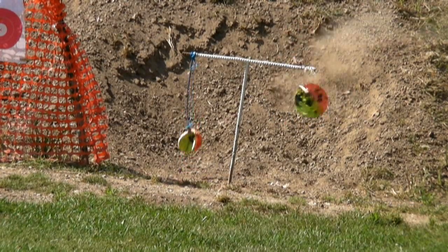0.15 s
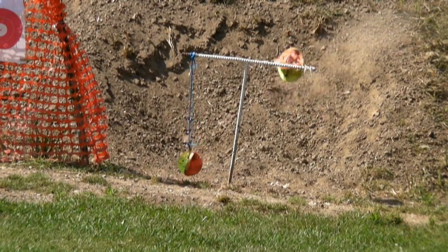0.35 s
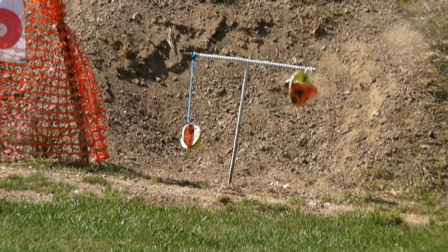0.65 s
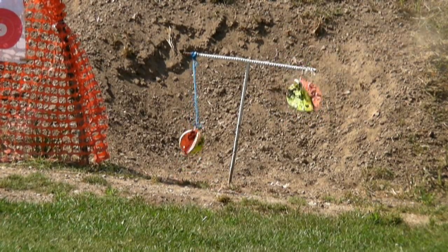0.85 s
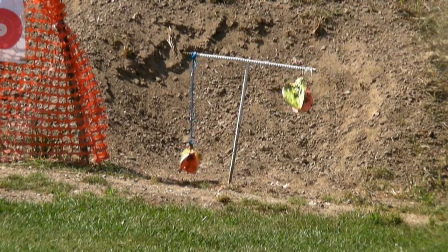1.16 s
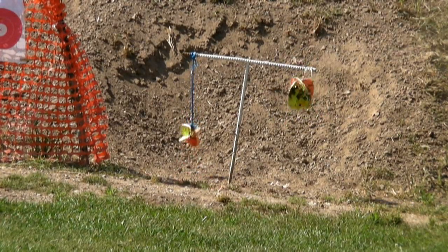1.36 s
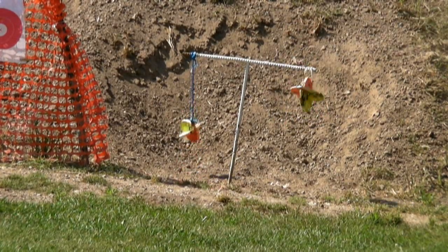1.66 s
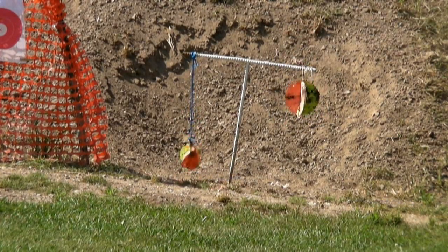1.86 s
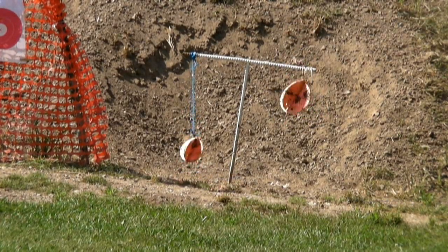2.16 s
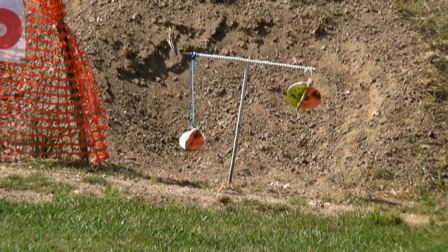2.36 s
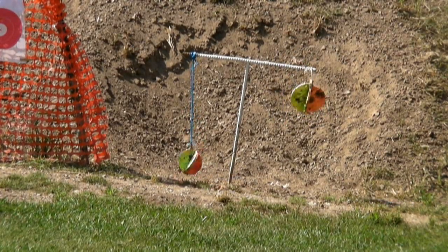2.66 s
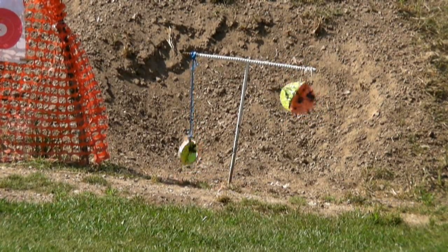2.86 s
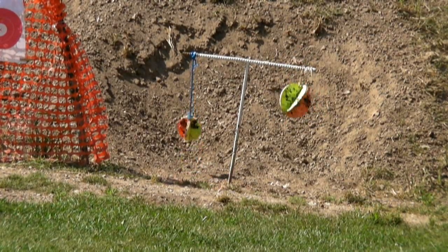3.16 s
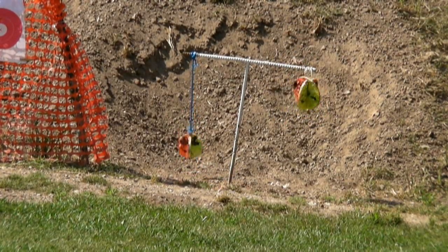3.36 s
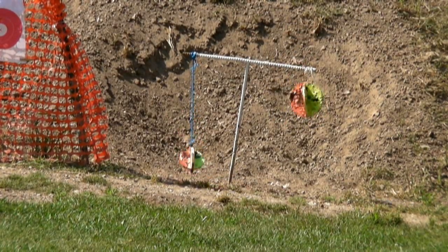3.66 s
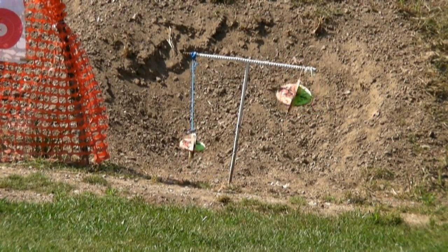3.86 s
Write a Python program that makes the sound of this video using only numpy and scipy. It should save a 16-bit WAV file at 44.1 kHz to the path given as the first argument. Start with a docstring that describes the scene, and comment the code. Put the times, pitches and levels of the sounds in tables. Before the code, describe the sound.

A rifle's lever clacks open and shut between a fading echo and a loud shot.

```python
"""An outdoor rifle range, from the roofed firing point. The echo of a shot rolls away over the earth
banks while the rifle's lever is thrown open and slammed shut, metal clacking and ringing. Sleeves
rustle, and dull knocks ring the wooden bench as the rifle is settled. Insects throb over open air
and a far engine until the next shot overloads the microphone."""
import sys
import numpy as np
from scipy import signal
from scipy.fft import rfft, irfft
from scipy.io import wavfile

SR = 44100
rng = np.random.default_rng(int(sys.argv[2]) if len(sys.argv) > 2 else 0)


def generate_wav(signal):
    """Clip the signal to [-1, 1] and save it as 16-bit WAV at the path in sys.argv[1]."""
    frames = np.transpose(np.atleast_2d(signal))
    scaled = np.clip(frames, -1, 1) * 32767
    pcm = np.round(scaled).astype(np.int16)
    wavfile.write(sys.argv[1], SR, pcm)


N = 176400
TIME = np.arange(N) / SR
FREQ = np.maximum(np.arange(N // 2 + 1) * SR / N, 1)


def from_db(db):
    """Decibels to gain."""
    return 10 ** (np.asarray(db) / 20)


def at_hz(points, hz):
    """Read a table on a log-frequency axis."""
    f, value = np.transpose(points)
    return np.interp(np.log(hz), np.log(f), value)


def decay(start, t60):
    """An envelope that jumps to 1 and falls 60 dB in t60 seconds."""
    age = TIME - start
    return (age >= 0) * np.exp(-np.log(1000) * np.clip(age / t60, 0, 10))


def swell(peak_s, half_width_s):
    """A bell-shaped fade in and out."""
    return np.exp(-((TIME - peak_s) / half_width_s) ** 2)


def resonance(hz, width_hz):
    """A band-pass curve that peaks at 1."""
    return 1 / (1 + 2 * ((FREQ ** 2 - hz ** 2) / (2 * FREQ * width_hz)) ** 2)


# Stereo images shared by several layers, far and near: (frequency [Hz], left-right correlation [0-1])
FAR_IMAGE = [(2000, 0.99), (6000, 0.95), (15000, 0.57)]
NEAR_IMAGE = [(300, 1), (3000, 0.98), (7000, 0.92), (14000, 0.19)]
def noise(colour, image):
    """Stereo noise with a given colour and stereo image, at unit rms."""
    alike = np.clip(at_hz(image, FREQ), -1, 1)
    mid, side = rng.standard_normal((2, 2 * len(FREQ))).view(complex)
    spectrum = np.sqrt(1 + alike) * mid + np.sqrt(1 - alike) * side * [[1], [-1]]
    x = irfft(colour * spectrum, N)
    return x / np.sqrt(np.mean(x ** 2) + 1e-20)


def fade_by_band(x, t60s, count=8):
    """Let each band die away at its own rate."""
    centres, spectrum = np.geomspace(80, 15000, count), rfft(x)
    bands = (irfft(spectrum * np.interp(np.log(FREQ), np.log(centres), share), N)
             for share in np.eye(count))
    return sum(band * decay(0, at_hz(t60s, hz)) for band, hz in zip(bands, centres))


def struck_mode(start, hz, t60, detune=0.011):
    """Three close partials that beat; the higher the pitch, the further left and right are out of step."""
    skew = np.arccos(np.clip(at_hz(NEAR_IMAGE, hz), -1, 1)) * np.array([[0], [1]])
    age = TIME[:SR // 2]
    partials = hz * (1 + detune * np.array([0, -1, 1]) * rng.uniform(0.5, 1, 3))
    ring = sum(gain * np.sin(2 * np.pi * f * age + phase + skew)
               for f, gain, phase in zip(partials, (1, 0.5, 0.5), (0, np.pi / 2, np.pi / 2)))
    ring *= decay(0, t60)[:SR // 2] / np.sqrt(2)
    return np.pad(ring, [(0, 0), (int(start * SR), N)])[:, :N]


# Tone of the rolling echo: (frequency [Hz], level [dB])
ECHO_EQ = [(40, -26), (300, -7.5), (520, -2), (850, -7.5), (1700, -3.5), (2800, -10), (4200, -10.5),
           (7000, -22.5), (15500, -50.5)]
# Length of its tail: (frequency [Hz], t60 [s])
ECHO_DECAY = [(100, 1.83), (500, 2.56), (1500, 2.2), (4000, 1.11), (9000, 0.91)]
# Stronger returns from the banks: (time [s], boost [dB], half width [s])
BANK_RETURNS = [(0.046, 4, 0.0099), (.074, 6, 0.022), (0.173, 5, 0.075), (.4, 5, 0.2)]
# Lone, sharp slapbacks: (time [s], level [dB])
SLAPBACKS = [(.108, -17), (.156, -21)]
# Resonances of the hollow under the roof: (frequency [Hz], added level [dB])
ROOF_MODES = [(490, -1.5), (538, 1), (635, -0.5)]
def echo():
    """A shot rolls back from banks and trees, swelling with each return and ringing under the roof."""
    colour = from_db(at_hz(ECHO_EQ, FREQ))
    roof = 1 + sum(from_db(db) * resonance(hz, width_hz=14) for hz, db in ROOF_MODES)
    roll = noise(colour * roof, FAR_IMAGE)
    lows = irfft(rfft(roll) / (1 + (FREQ / 576) ** 4), N)
    roll -= lows * swell(0, half_width_s=0.082)  # the low end blooms late
    boost_db = sum(db * swell(s, width) for s, db, width in BANK_RETURNS)
    slaps = noise(colour / (1 + (FREQ / 5000) ** 2), FAR_IMAGE)
    slaps *= sum(from_db(db) * decay(s, t60=0.031) for s, db in SLAPBACKS)
    thud = from_db(-15.5) * np.sin(2 * np.pi * 382.3 * TIME) * swell(0.069, 0.012)  # strongest return
    return fade_by_band(roll, ECHO_DECAY) * from_db(boost_db - 13) + slaps + thud


# Tone of the open air: (frequency [Hz], level [dB])
AIR_EQ = [(25, -7), (60, 0.5), (100, 0.5), (150, -5), (390, -12), (800, -13), (2800, -24.5), (4200, -24),
          (15500, -36.5)]
# Stereo image of air and insects: (frequency [Hz], left-right correlation [0-1])
AIR_IMAGE = [(60, 1), (950, 0.89), (3800, 0.35), (15000, 0.3)]
def open_air():
    """A low outdoor rumble with a faint, wide hiss on top."""
    return noise(from_db(at_hz(AIR_EQ, FREQ)), AIR_IMAGE)


def far_engine():
    """A distant engine, heard as a narrow band of low drone."""
    return from_db(-6) * noise(resonance(hz=110.6, width_hz=9), FAR_IMAGE)


def insects(pitch_hz=8540, pulse_hz=20, depth_db=8.5, rise_db_per_s=2):
    """The nearest insect pulses and grows louder over the steady chorus of the others."""
    throb_db = rise_db_per_s * TIME + depth_db * np.sin(2 * np.pi * pulse_hz * TIME)
    singer = from_db(throb_db - 25.5) * noise(resonance(pitch_hz, width_hz=150), AIR_IMAGE)
    chorus = from_db(-16) * noise(resonance(pitch_hz, width_hz=1214), AIR_IMAGE)
    return singer + chorus


# Level of the ambience bed over time: (time [s], level [dB])
AMBIENCE_LEVEL = [(1.5, -47), (2.1, -45), (2.8, -44), (3.85, -40)]
def ambience():
    """Air, engine and insects together, under one level that slowly rises."""
    level_db = np.interp(TIME, *np.transpose(AMBIENCE_LEVEL))
    return (open_air() + far_engine() + insects()) * from_db(level_db)


# Hand and sleeve moves: (time [s], half width [s], level [dB], centre [Hz])
CLOTH_MOVES = [(0.368, 0.032, -36, 6600), (3.25, 0.031, -45, 596)]
def rustles():
    """Soft swells of hiss as the shooter moves."""
    return sum(from_db(db) * noise(resonance(hz, width_hz=0.87 * hz), NEAR_IMAGE) * swell(s, width)
               for s, width, db, hz in CLOTH_MOVES)


# Metal hits in the action: (time [s], level [dB], bass shelf [dB], treble shelf [dB], t60 [s])
LEVER_HITS = [(0.5064, -15.5, 14, 12.5, 0.04), (0.5161, -11, 5.5, -14, 0.044),
              (0.5191, -3.5, -13, 10, 0.021), (0.577, -11.5, -1.5, 9.5, 0.028),
              (0.6283, -9.5, -3.5, 6.5, 0.031), (0.6383, -15.5, -12, -2.5, 0.048),
              (0.6488, -3, -11, 4.5, 0.064), (.7906, -19, -0.5, 0, 0.068), (.806, -16.5, 2, -1, 0.099),
              (0.8253, -11, -26.5, -4, 0.03), (0.8299, -11, -28, 0.5, 0.091), (0.86, -18, -9.5, 3, 0.067),
              (.869, -14.5, -11, 1, 0.068), (0.8803, -4.5, -33, 3, 0.061), (0.889, -5, -32, 0.5, 0.041),
              (0.8981, -4.5, -14.5, 6.5, 0.033), (1.007, 1, 4, 8.5, 0.059), (1.0248, -15, 7.5, -2, 0.044)]
# Tone common to those hits: (frequency [Hz], level [dB])
HIT_EQ = [(30, -36.5), (110, -20.5), (600, 1), (1300, 2.5), (2300, 3), (4200, 1), (9000, -6), (15500, -12)]
# Ring of stock and receiver: (frequency [Hz], level [dB], t60 [s])
BODY_MODES = [(629.3, -19, 0.23), (2868, -11.5, 0.086), (3550, -8, 0.076), (4090, -2, 0.055),
              (6410, -10, 0.075), (6720, -18, 0.25), (9200, -10.5, 0.066)]
# Small steel and brass parts ringing on: (time [s], frequency [Hz], level [dB], t60 [s])
PART_PINGS = [(.5063, 10270, -9, 0.09), (.5195, 7570, -9.5, 0.068), (0.825, 12100, -9.5, 0.08),
              (.8975, 12000, -12, .05), (1.3355, 6700, -33, .24)]
def lever(ring_db_per_db=3.8, ripple_db=1.5):
    """Each contact is a short crash of dense modes that rings the rifle's body; small parts ping."""
    bass_shelf = 1 / (1 + (FREQ / 563) ** 2)
    treble_shelf = 1 / (1 + (6950 / FREQ) ** 4)
    clacks = 0
    blows = np.zeros((len(BODY_MODES), N))
    for s, db, bass_db, treble_db, t60 in LEVER_HITS:
        # Each contact favours different modes.
        ripple = ripple_db * np.interp(FREQ, np.linspace(0, SR / 2, 120), rng.standard_normal(120))
        colour = from_db(at_hz(HIT_EQ, FREQ) + bass_db * bass_shelf + treble_db * treble_shelf + ripple)
        clacks += from_db(db) * noise(colour, NEAR_IMAGE) * decay(s, t60)
        # The ring grows steeply with the hit, so mainly the closing slam rings.
        blows[:, int(s * SR)] = from_db(ring_db_per_db * db + rng.normal(0, 1, len(BODY_MODES)))
    body = 0
    for hits, (hz, db, t60) in zip(blows, BODY_MODES):
        ring = struck_mode(0, hz, t60)[:, :SR // 3]
        body += from_db(db) * signal.oaconvolve(hits[None], ring, axes=1)[:, :N]
    pings = sum(from_db(db) * struck_mode(s, hz, t60) for s, hz, db, t60 in PART_PINGS)
    return clacks + body + pings + from_db(-7.5) * shelter_reverb(clacks)


# Reverb time under the roof: (frequency [Hz], t60 [s])
SHELTER_DECAY = [(500, 0.61), (1200, 0.29), (3000, 0.33), (8000, 0.33), (15000, 0.24)]
def shelter_reverb(x):
    """Dense reflections from roof, posts and benches."""
    fade_in = 1 - decay(0, t60=0.014)
    tail = (fade_by_band(noise(1, NEAR_IMAGE), SHELTER_DECAY) * fade_in)[:, :SR // 2]
    tail /= np.sqrt(np.sum(tail ** 2) / 2)
    return signal.fftconvolve(x, tail, axes=1)[:, :N]


# Dull knocks on the bench: (time [s], level [dB], high cut [Hz])
BENCH_HITS = [(1.3365, -11, 2650), (1.4158, -26, 3300), (1.4254, -17.5, 3940), (1.743, -42, 3300),
              (2.004, -33, 3630), (2.363, -42.5, 3590), (3.5003, -39.5, 3000)]
# Tone of the wood: (frequency [Hz], level [dB])
WOOD_EQ = [(25, -30), (200, -7), (800, 0.5), (1200, 2), (2000, 3.5), (4000, -1.5), (9000, -16)]
# Ringing modes of the bench: (frequency [Hz], level [dB])
WOOD_MODES = [(1560, -19), (2094, -16.5)]
def bench_knocks(tick_db=-20.5):
    """Wooden knocks set the bench ringing; each has its own loudness and dullness."""
    ring = sum(rng.choice([-1, 1]) * from_db(db) * struck_mode(0, hz, t60=0.17) for hz, db in WOOD_MODES)
    knocks = 0
    for s, db, cut_hz in BENCH_HITS:
        high_cut = 1 / (1 + (FREQ / cut_hz) ** 10) + from_db(tick_db)  # a little tick gets through
        crack = noise(from_db(at_hz(WOOD_EQ, FREQ)) * high_cut, FAR_IMAGE) * decay(s, t60=0.048)
        placed_ring = np.pad(ring, [(0, 0), (int(s * SR), 0)])[:, :N]
        knocks += from_db(db) * (crack + placed_ring)
    return knocks + from_db(-6.5) * shelter_reverb(knocks)


def jolt(start_s=3.882, length_s=0.0096, hz=493, grit=0.14):
    """A brief, slightly rough thump just ahead of the blast, almost hard left."""
    age = TIME - start_s
    envelope = np.sin(np.pi * np.clip(age / length_s, 0, 1))
    thump = np.sin(2 * np.pi * hz * age) + grit * noise(resonance(2 * hz, width_hz=hz), FAR_IMAGE)
    return envelope * thump * from_db([[5], [-28]])


# Noise layers of the shot: (time [s], level [dB], centre [Hz], width [Hz], attack [s], t60 [s])
BLAST_LAYERS = [(3.891, 15, 7600, 5630, 0.00057, 0.26), (3.891, 6, 970, 1810, 0.0014, 0.99),
                (3.905, 7.5, 5000, 3390, 0.0092, 0.45), (3.925, 12.5, 1210, 2330, 0.011, 0.99),
                (3.972, 20, 420, 610, 0.0016, 0.12), (3.891, -6, 110, 111, 0.045, 2.1)]
# Stereo image of the shot: (frequency [Hz], left-right correlation [0-1])
BLAST_IMAGE = [(400, 0.97), (1300, 0.68), (4000, 0.44), (9000, 0.049)]
def shot():
    """The rifle fires: a searing crack darkens into the blast and its first boom."""
    blast = 0
    for s, db, hz, width_hz, attack, t60 in BLAST_LAYERS:
        envelope = np.clip((TIME - s) / attack, 0, 1) * decay(s, t60)
        blast += from_db(db) * noise(resonance(hz, width_hz), BLAST_IMAGE) * envelope
    return blast


def scene():
    """The full mix at the firing point."""
    return echo() + ambience() + rustles() + lever() + bench_knocks() + jolt() + shot()


def record(dry, notch_hz=7900, cutoff_hz=15750):
    """The microphone chain: preamp overload, a narrow notch, a clip at full scale and a steep high cut."""
    overloaded = np.clip(dry, -1, 1)
    notched = signal.lfilter(*signal.iirnotch(notch_hz, Q=24.8, fs=SR), overloaded)
    high_cut = signal.ellip(10, 0.1, 70, cutoff_hz, fs=SR, output="sos")
    return signal.sosfilt(high_cut, np.clip(notched, -1, 1))


dry = scene()
out = record(dry)
generate_wav(out)
```